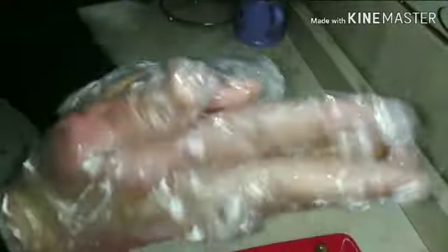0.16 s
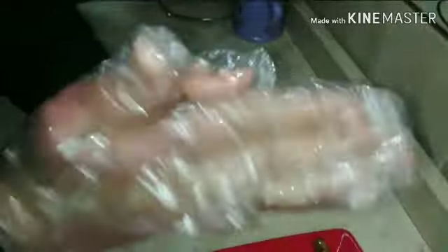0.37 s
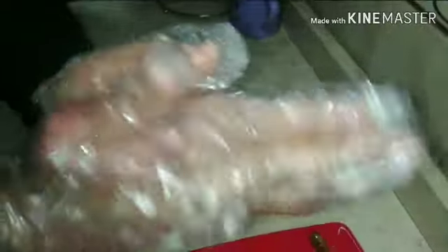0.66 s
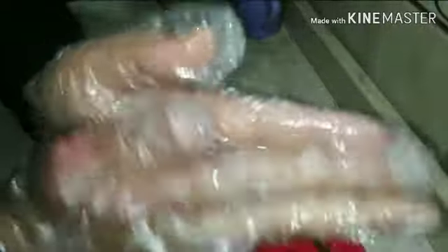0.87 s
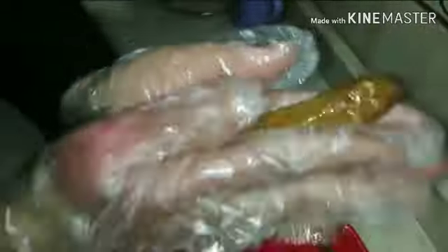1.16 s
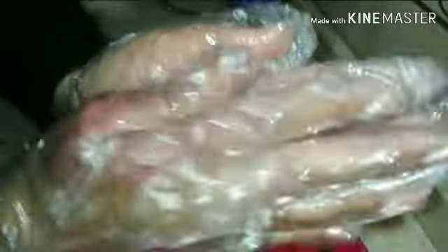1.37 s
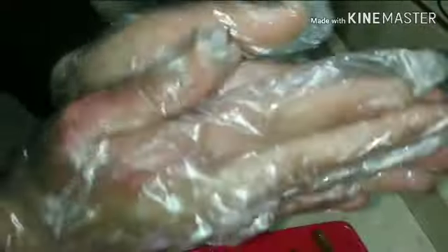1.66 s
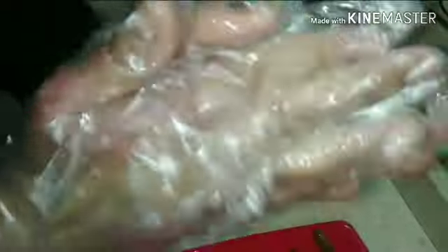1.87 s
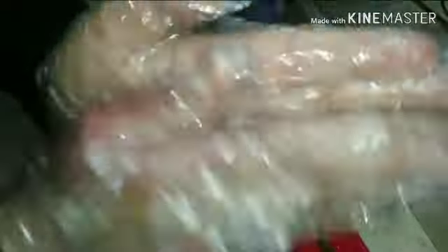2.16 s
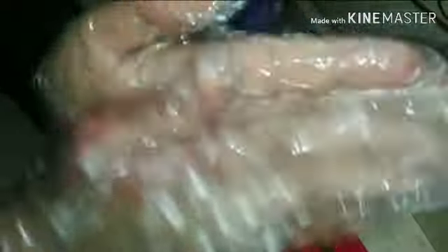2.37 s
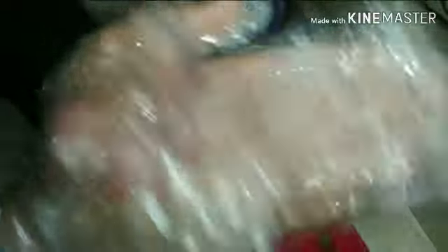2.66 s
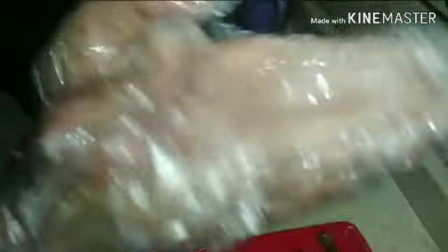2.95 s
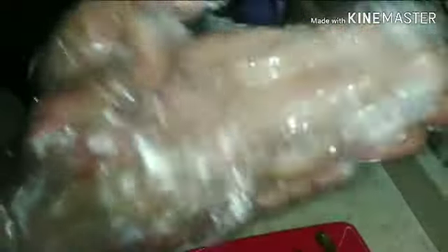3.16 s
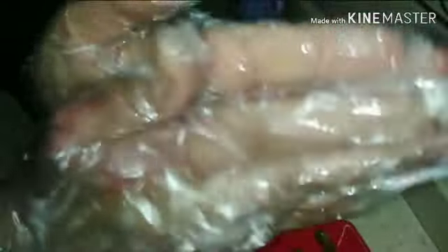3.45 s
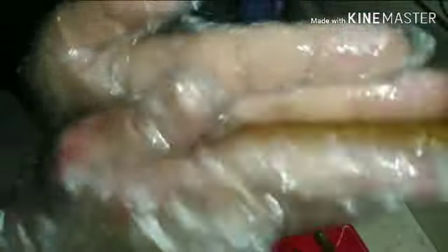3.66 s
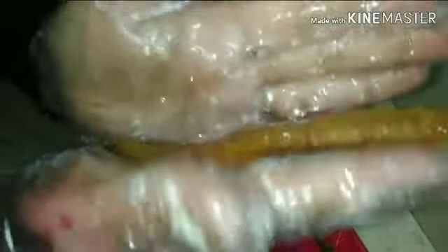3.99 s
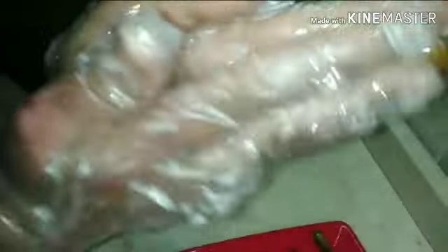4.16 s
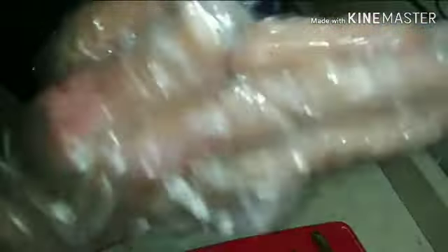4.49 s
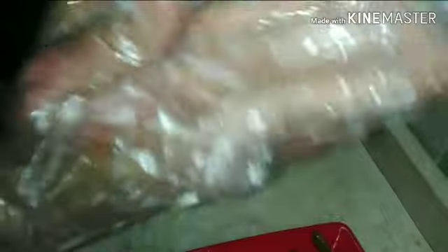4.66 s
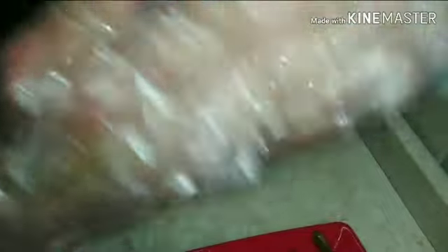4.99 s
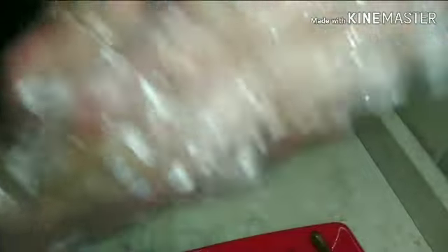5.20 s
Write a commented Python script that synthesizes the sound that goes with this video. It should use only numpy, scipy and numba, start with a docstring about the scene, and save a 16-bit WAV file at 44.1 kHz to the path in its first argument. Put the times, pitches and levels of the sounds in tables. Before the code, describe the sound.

Close, rapid crinkling and rubbing of thin plastic gloves as two palms roll paste between them, with a few sharp pops.

```python
"""A dense crackle comes in quick strokes: two hands in thin oiled plastic gloves roll sticky paste to and
fro over a kitchen counter. Creases in the film snap, folds resonate in a duller rustle, and the palms
add a soft rumble and thud. Now and then one crease pops out alone or the palms meet with a thump.
The counter returns a short echo, the walls a brief tail, all over a faint hush. The two microphone
ports of a phone close by ring at different treble pitches."""
import sys
import numpy as np
from scipy import signal
from scipy.fft import rfft, irfft
from scipy.io import wavfile
from scipy.ndimage import uniform_filter1d
from numba import njit

SR = 44100
rng = np.random.default_rng(int(sys.argv[2]) if len(sys.argv) > 2 else 0)


def unload_audio(sound):
    """Save the sound as a 16-bit wav file, at the path given as the first command line argument."""
    columns = np.transpose(np.atleast_2d(sound))
    # keep every value between -1 and 1, then stretch to whole-number steps
    steps = np.round(np.clip(columns, -1, 1) * 32767)
    wavfile.write(sys.argv[1], SR, steps.astype(np.int16))


N = 235097
T = np.arange(N) / SR
FFT_SIZE = 2 ** 18
F = np.fft.rfftfreq(FFT_SIZE, 1 / SR) + 1  # Hz, offset to keep the logarithm finite
RUMBLE_HZ, RUSTLE_HZ, CRACKLE_HZ, TOP_HZ = 410, 1020, 3750, 14230  # three lower band edges; the top edge


def undb(db):
    """Decibels to amplitude ratio."""
    return 10 ** (np.asarray(db) / 20)


def unit(x):
    """Normalisation to unit RMS."""
    return x / np.sqrt(np.mean(x ** 2))


def below(hz):
    """Third-order Butterworth low-pass magnitude."""
    return 1 / np.sqrt(1 + (F / hz) ** 6)


def above(hz):
    """The power complement of the low-pass."""
    return np.sqrt(1 - below(hz) ** 2)


def shape(x, gain):
    """Filtering as multiplication of spectra."""
    return irfft(rfft(x, FFT_SIZE) * gain, FFT_SIZE)[..., :N]


def walk(rate):
    """Slow random modulation: values held 1 / rate s and smoothed twice, with a spread near 1."""
    hold = int(SR / rate)
    steps = np.repeat(rng.standard_normal(N // hold + 1), hold)
    return 1.68 * uniform_filter1d(uniform_filter1d(steps, hold), hold)[:N]


def snaps(rate, spread_db, shared):
    """Shot noise: uneven impulses at random moments, with a share of the power common to both ports."""
    when = rng.random((3, N)) < rate / SR
    size = undb(spread_db * rng.standard_normal((3, N))) * rng.standard_normal((3, N))
    both, left, right = when * size
    return np.sqrt(shared) * both + np.sqrt(1 - shared) * np.array([left, right])


# Spectrum of the hands at each port, below its resonance: (frequency [Hz], gain [dB])
LEFT_SPECTRUM = [(25, -30), (60, -33), (130, -10), (250, -12), (380, -5), (560, -10), (900, -7.5),
                 (1300, -7), (1650, 0.1), (1850, -1.5), (2500, -0.5), (3700, -1.5), (5500, 4.5)]
RIGHT_SPECTRUM = [(25, -32), (60, -19), (130, -7), (250, -9.5), (380, -26), (500, -12.5), (700, -5.5),
                  (950, -9.5), (1300, -6), (1600, -5.5), (2000, -2), (2600, -0.5), (3700, -0.5),
                  (5500, 1.5)]
# Left and right port: (resonance [Hz], bandwidth [Hz], resonance gain [dB], gain at TOP_HZ [dB])
PORT_RESONANCES = [(8460, 2190, 19, -9), (7100, 1620, 12.5, -5.5)]
def port(side):
    """Acoustic resonance: the air in a port (0 left, 1 right) adds a peak to a broad spectrum."""
    hz, width, ring_db, top_db = PORT_RESONANCES[side]
    point_hz, point_db = np.transpose([*(LEFT_SPECTRUM, RIGHT_SPECTRUM)[side], (TOP_HZ, top_db)])
    resonance = undb(ring_db) * (F / hz) ** 2 / (1 + (2 * (F - hz) / width) ** 2)
    return undb(np.interp(np.log(F), np.log(point_hz), point_db)) + resonance


def heard(x, band, left_lag_s=.0001):
    """Path difference: one band of sound passes through both ports and reaches the left one later."""
    delay = np.exp(-2j * np.pi * F * left_lag_s)
    return shape(x, band * np.array([delay * port(0), port(1)]))


# Hand strokes: (time at full speed [s], hold [s], level [dB], extra level of rubbing [dB])
HAND_STROKES = [(0.006, 0.073, -32, 4), (0.144, 0.068, -27.5, 1.5), (0.276, 0.042, -27.5, 2.5),
                (0.38, 0.038, -28.5, 5), (0.482, 0.066, -28, 2), (0.597, 0.059, -30.5, 6.5),
                (0.728, 0.051, -27.5, 3.5), (0.853, 0.11, -35, -11), (0.98, 0.013, -29, 1.5),
                (1.057, 0.049, -30.5, -1), (1.19, 0.022, -22.5, 2.5), (1.222, 0.04, -27, -5),
                (1.291, 0.017, -25, -3.5), (1.361, 0.031, -30.5, 3.5), (1.438, 0.06, -28.5, -2),
                (1.524, 0.0067, -25.5, -1), (1.614, 0.065, -28.5, 2), (1.773, 0.043, -26.5, 2.5),
                (1.879, 0.0084, -22.5, 2.5), (1.903, 0.032, -28, 4.5), (1.992, 0.044, -24.5, -2),
                (2.086, 0.041, -25, -1.5), (2.207, 0.029, -22.5, 5), (2.299, 0.024, -18, -5),
                (2.392, 0.044, -22, 2), (2.495, 0.04, -23, 0.5), (2.596, 0.044, -25.5, 4.5),
                (2.695, 0.049, -22.5, -0.5), (2.799, 0.048, -21, 0.5), (2.912, 0.031, -20, 2.5),
                (3.011, 0.06, -23, 2.5), (3.119, 0.055, -23.5, 3), (3.227, 0.069, -26.5, 4),
                (3.354, 0.04, -24, 3), (3.478, 0.038, -25, 3.5), (3.582, 0.024, -26.5, -1),
                (3.691, 0.022, -22.5, -0.5), (4.135, 0.03, -36, -8), (4.172, 0.0095, -29, 4.5),
                (4.246, 0.071, -38.5, 6), (4.343, 0.025, -30.5, -7), (4.557, 0.085, -32, -2.5),
                (4.718, 0.057, -24.5, -6), (4.808, 0.063, -26.5, 2.5), (4.925, 0.057, -25, 2.5),
                (5.024, 0.052, -25, 1.5), (5.146, 0.047, -23.5, -2.5), (5.247, 0.039, -23.5, -0.5)]
# Film shifting between and under the strokes: (time [s], level [dB])
FILM_SHIFTING = [(0.0, -34), (0.8, -32.5), (1.0, -28.5), (1.3, -35.5), (1.6, -32), (2.2, -34.5),
                 (3.1, -31.5), (3.7, -32.5), (3.8, -31.5), (4.0, -31), (4.055, -40.5), (4.11, -36),
                 (4.2, -32), (4.5, -35.5), (4.68, -38), (4.8, -41), (5.33, -30.5)]
def strokes(rub_share, rise_db_per_s=371, grow_db_per_s=32, fall_db_per_s=484, smooth_s=.0034):
    """Incoherent sources add in power: the envelope of strokes that speed up, swell a little and slow."""
    power = undb(2 * np.interp(T, *np.transpose(FILM_SHIFTING)))
    for start, hold, db, rub_db in HAND_STROKES:
        near = slice(max(int((start - .2) * SR), 0), int((start + hold + .2) * SR))
        t = T[near] - start
        swell_db = grow_db_per_s * (np.clip(t, 0, hold) - hold / 2)
        fade_db = rise_db_per_s * np.maximum(-t, 0) + fall_db_per_s * np.maximum(t - hold, 0)
        power[near] += undb(2 * (db + rub_share * rub_db + swell_db - fade_db))
    return uniform_filter1d(np.sqrt(power), int(smooth_s * SR))


def follow(envelope, smear_s, exponent, reference_db=-30):
    """Power law: the gain moves by `exponent` dB per dB of the smoothed envelope."""
    return (uniform_filter1d(envelope, int(smear_s * SR)) / undb(reference_db)) ** exponent


def crackle(push, rub, large_db, middling_hz=6430, fine_hz=10300):
    """Buckling: creases of three sizes snap in flickering patches; the smaller, the higher they sound."""
    # Negative exponents make large and fine creases swell less than middling ones.
    large_gain = (rub / push) ** .32 * follow(push, .008, -.1) * undb(large_db)
    fine_gain = follow(push, .008, -.26)
    sizes = [(below(middling_hz), large_gain, 4500, .7, 1.3),
             (above(middling_hz) * below(fine_hz), 1, 8000, .4, .9),
             (above(fine_hz), fine_gain, 9000, .3, .7)]
    creases = 0
    for band, gain, rate, wander_db, flicker_db in sizes:
        clicks = snaps(rate, spread_db=.85, shared=.019) / np.sqrt(rate)
        patches = undb(wander_db * walk(14) + flicker_db * walk(160))
        creases += heard(clicks, above(CRACKLE_HZ) * band) * gain * patches
    return unit(creases) * push


@njit
def resonator(x, tuning, damping):
    """A damped oscillator as a state-variable band-pass; tuning = tan(pi * frequency / SR) per sample."""
    y = np.empty(x.shape)
    for channel in range(len(x)):
        band_state, low_state = 0., 0.
        for i in range(x.shape[1]):
            g = tuning[i]
            band = (band_state + g * (x[channel, i] - low_state)) / (1 + g * (g + damping))
            band_state = 2 * band - band_state
            low_state += 2 * g * band
            y[channel, i] = damping * band
    return y


# Resonances of the folds: (frequency [Hz], bandwidth [Hz], gain [dB], pitch wander [relative])
FOLD_MODES = [(1410, 390, -3.5, 0.058), (1641, 115, 3, 0.022), (1982, 250, 0, 0.074), (2280, 230, 1, 0.034),
              (2885, 750, 1, 0.18), (3130, 410, -1, 0.27), (3990, 400, 0.5, 0.035), (4490, 470, -0.5, 0.12)]
# Smaller or larger folds lead in turn: (time [s], spectral slope [dB/octave])
FOLD_SLOPE = [(0, -4), (.12, -1), (.3, 4), (.4, 0), (.45, 4), (.77, -2), (.85, 6.5), (1.19, 1.5), (1.29, 3),
              (1.34, -2), (1.59, 5), (1.68, 0), (1.82, -3), (2.14, 1.5), (2.24, -3), (2.3, 1.5), (2.42, -7),
              (2.54, 6), (2.62, -0.5), (3.0, 0.5), (3.5, -0.5), (3.88, 3), (4.1, 1), (4.6, 2.5), (5.0, 6),
              (5.33, -1)]
def rustle(rub, pivot_hz=2230, patchy_db=2.3):
    """Forced resonance: folds ring at pitches that wander as the film is pulled, and each comes and goes."""
    drive = heard(snaps(10000, spread_db=1.4, shared=.27), above(RUSTLE_HZ) * below(CRACKLE_HZ))
    slope = np.interp(T, *np.transpose(FOLD_SLOPE))
    folds = 0
    for hz, width, db, wander in FOLD_MODES:
        gain = undb(db + slope * np.log2(hz / pivot_hz) + patchy_db * walk(55))
        pitch_hz = hz * (1 + .5 * wander * walk(12))
        folds += gain * resonator(drive, np.tan(np.pi * pitch_hz / SR), width / hz)
    return unit(folds) * follow(rub, .015, .75) * undb(.46 * walk(20))


def rumble(push, rub):
    """Amplitude modulation: the low-mid noise of the rolling palms swells with each stroke."""
    noise = heard(snaps(6000, spread_db=.94, shared=.51), above(RUMBLE_HZ) * below(RUSTLE_HZ))
    return unit(noise) * follow(np.sqrt(push * rub), .014, .79) * undb(.74 * walk(20))


# Weight of the lowest part of the thud: (time [s], gain [dB])
BASS_WEIGHT = [(0, -3), (.4, 1), (.8, 3), (1.3, -3), (1.7, 0.5), (2.0, 3), (2.4, 0), (2.9, 0.5),
               (3.3, -2.5), (3.7, -4.5), (4.05, -6), (4.2, -5), (4.4, -3), (4.75, -9), (4.9, -5), (5.33, 0)]
def thud(push, bass_hz=180):
    """Temporal smearing: the heaviest layer, two bands of low noise, follows the strokes most loosely."""
    upper = heard(snaps(6000, spread_db=.79, shared=.5), below(RUMBLE_HZ) * above(bass_hz))
    bass = heard(snaps(6000, spread_db=.63, shared=.46), below(RUMBLE_HZ) * below(bass_hz))
    bass *= undb(np.interp(T, *np.transpose(BASS_WEIGHT)) + .57 * walk(9.5))
    return unit(upper + bass) * follow(push, .034, .74) * undb(.93 * walk(16))


def room_noise(hush_db=-52, murmur_db=-83):
    """Stationary noise: a faint hush over a fainter low murmur."""
    hush = unit(shape(rng.standard_normal((2, N)), port(1)))
    murmur = unit(shape(rng.standard_normal((2, N)), below(120)))
    return undb(hush_db) * hush + undb(murmur_db) * murmur


def reflections(echo_s=.0028, echo_db=-14, dull_hz=3600, t60_s=.18, tail_db=-18):
    """Reflection and reverberation: the frequency response of a dull counter echo and a hard-wall tail."""
    counter = undb(echo_db) * below(dull_hz) * np.exp(-2j * np.pi * F * echo_s)
    tail = rng.standard_normal((2, SR // 2)) * 1000 ** (-T[:SR // 2] / t60_s)
    tail *= undb(tail_db) / np.linalg.norm(tail, axis=1, keepdims=True)
    return counter + rfft(tail, FFT_SIZE)


# Creases that pop out alone: (time [s], left level [dB], right level [dB])
LONE_CREASES = [(0.3162, -18.4, -18.0), (1.2415, -10.3, -25.5), (1.3654, -15.1, -26.5),
                (1.3846, -21.7, -21.0), (1.4561, -12.8, -17.6), (1.4604, -19.7, -18.4),
                (1.544, -20.9, -20.2), (1.564, -18.2, -18.1), (1.5937, -16.1, -33.1),
                (1.7244, -15.1, -33.5), (1.8129, -12.4, -25.0), (1.8834, -9.2, -22.9),
                (2.103, -12.0, -28.1), (2.1098, -10.6, -26.0), (2.1466, -13.5, -26.1),
                (2.6252, -9.1, -21.7), (2.8378, -15.3, -14.8), (4.3638, -13.2, -25.0),
                (4.7644, -15.1, -18.9), (5.1459, -9.9, -22.6)]
def pops(t60_s=.003):
    """Impulse excitation: a click with ever smaller ones behind it rings the ports."""
    times, *levels_db = np.transpose(LONE_CREASES)
    clicks = np.zeros((2, N))
    clicks[:, (times * SR).astype(int)] = undb(levels_db)
    fading = signal.lfilter([1], [1, -1000 ** (-1 / (t60_s * SR))], clicks)
    clicks += .2 * fading * rng.standard_normal(N)
    band = above(RUSTLE_HZ)
    impulse_response = heard(signal.unit_impulse(N, "mid"), band)
    return heard(clicks, band) / np.abs(impulse_response).max(axis=1, keepdims=True)


# Palms meeting softly: (time [s], level [dB], frequency [Hz])
PALM_CONTACTS = [(1.045, -51, 135), (1.068, -54, 135), (1.097, -53, 165), (1.195, -46, 164),
                 (1.25, -53, 340), (1.965, -58, 120), (2.302, -46, 230), (2.425, -46, 200),
                 (2.735, -53, 175), (2.795, -47, 235), (2.925, -54, 140), (3.04, -49, 190),
                 (5.165, -52, 165), (5.265, -53, 130)]
def thumps(rise_s=.0037, t60_s=.062):
    """Cavity resonance: each contact pushes softly and the cupped air rings for a few cycles."""
    out = np.zeros(N)
    for start, db, hz in PALM_CONTACTS:
        t = np.maximum(T - start, 0)
        envelope = (1 - np.exp(-t / rise_s)) * 1000 ** (-t / t60_s)
        out += 2 * undb(db) * envelope * np.sin(2 * np.pi * hz * t)
    return out


# Slow drift in the balance of the layers, before the strokes modulate them: (time [s], large-crease
# gain [dB], rustle level [dB], rumble level [dB], thud level [dB], crackle left over right [dB])
LAYER_BALANCE = [(0, 0, -40, -54.5, -69, 0.5), (.3, 2, -44.5, -60, -62, 0.4),
                 (.9, 0.5, -44.5, -60, -66.5, 3), (1.06, 2.5, -38, -54, -60.5, 3),
                 (1.14, 0, -40, -49, -56, -1), (1.2, -0.5, -44, -57, -56.5, 3),
                 (1.3, 2.5, -42, -55.5, -58, 0), (1.5, 0.5, -45.5, -58.5, -64.5, -0.5),
                 (1.7, -0.5, -44, -59, -64, 2), (2.1, 1.5, -43, -58, -65.5, 2),
                 (2.3, 1, -42.5, -59.5, -61.5, 1), (2.55, 2, -45.5, -59.5, -64, 2.5),
                 (2.9, 0.5, -44.5, -59.5, -60.5, 1), (3.5, 0.2, -45, -62, -60, 1),
                 (3.9, 4, -38.5, -55.5, -61, 2.5), (4.2, 1, -44, -60, -62, -0.5),
                 (4.45, 2.5, -42, -58, -71, 0.5), (4.7, 2.5, -40.5, -56, -68, 1),
                 (4.85, -1.2, -45, -59.5, -58, 2.5), (5.33, 1.5, -41.5, -58.5, -62.5, 1)]
def scene():
    """Superposition: the sounds of the hands add to their own reflections and the noise of the room."""
    background, reflected = room_noise(), reflections()
    times, *columns = np.transpose(LAYER_BALANCE)
    large_db, rustle_db, rumble_db, thud_db, lean_db = (np.interp(T, times, db) for db in columns)
    push, rub = strokes(rub_share=0), strokes(rub_share=1)
    hands = crackle(push, rub, large_db) * undb([lean_db / 2, -lean_db / 2])
    hands += rustle(rub) * undb(rustle_db)
    hands += rumble(push, rub) * undb(rumble_db)
    hands += thud(push) * undb(thud_db)
    hands += pops() + thumps()
    return shape(hands, 1 + reflected) + background


def record(dry):
    """Band limiting: the phone cuts the top steeply with an elliptic low-pass."""
    return signal.sosfilt(signal.ellip(16, .3, 95, TOP_HZ, fs=SR, output="sos"), dry)


dry = scene()
out = record(dry)
unload_audio(out)
```